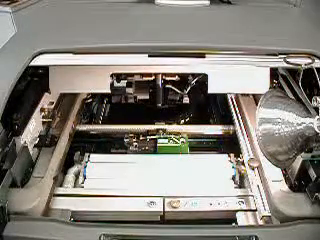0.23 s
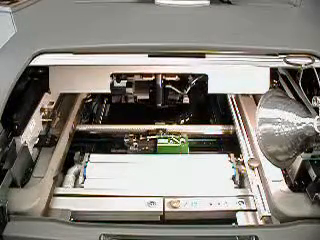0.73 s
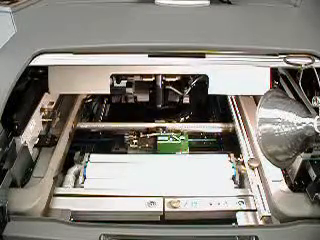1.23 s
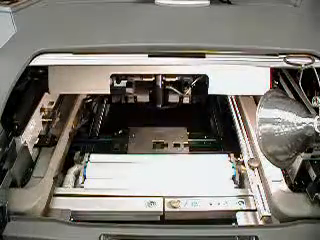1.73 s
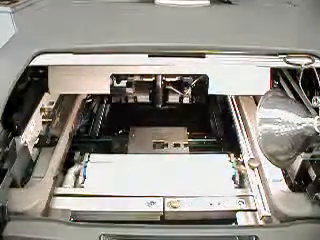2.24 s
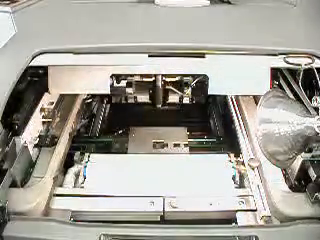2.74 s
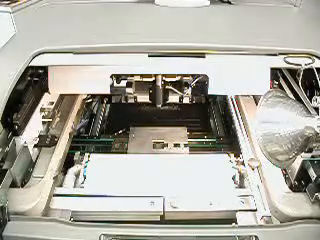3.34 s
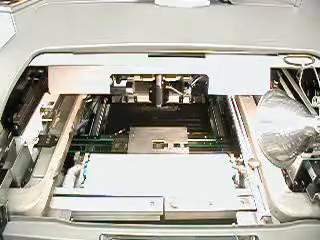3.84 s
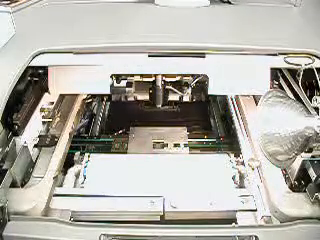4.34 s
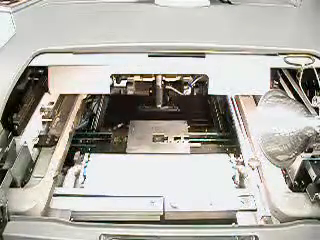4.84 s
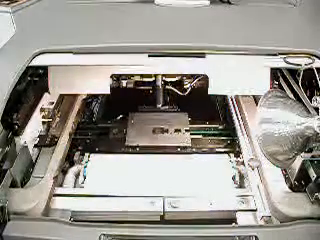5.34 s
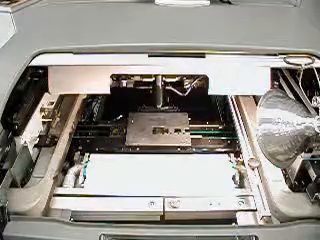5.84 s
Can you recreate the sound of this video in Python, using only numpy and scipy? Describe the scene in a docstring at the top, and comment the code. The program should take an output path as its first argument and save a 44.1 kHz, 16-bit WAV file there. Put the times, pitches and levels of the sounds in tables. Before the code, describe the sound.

A small, low-quality microphone inside a machine cabinet picks up constant fan rush and rough low hum. Air puffs open into steady coloured hiss. A fast carriage gives one brief swooping whine with rumble. Later comes a rapid row of dry ticks, then a buzzing mid-pitched motor and a bright, rattling metal clack. Hiss and motor cut off, and quiet fan hum with faint taps remains.

```python
"""An automated circuit board machine at work, heard from inside: its cooling fans hum and rush.
A vacuum line hisses on and off, with short bursts of air near its start. The head rushes away with
a rising and falling servo whine, a table motor drones and a clamp clacks. Hiss and rattle are shaped
noise; hum, whine and drone are wavering sines. A cheap camera samples the sound 8000 times a second
and holds each sample, which mirrors the spectrum upward."""
import sys
import numpy as np
from scipy import signal
from scipy.io import wavfile
from scipy.ndimage import uniform_filter1d

SR = 44100
rng = np.random.default_rng(int(sys.argv[2]) if len(sys.argv) > 2 else 0)


def dump(signal):
    """Clip the signal to [-1, 1] and save it as 16-bit WAV at the path in sys.argv[1]."""
    limited = np.clip(np.atleast_2d(signal).T, -1, 1)
    pcm = np.round(limited * 32767).astype(np.int16)
    wavfile.write(sys.argv[1], SR, pcm)


N = 268559  # length in samples


def gain_of(db):
    """Turns decibels into a factor."""
    return 10 ** (np.asarray(db) / 20)


def evened(x):
    """Scales a sound to an average (rms) strength of 1."""
    return x / np.sqrt(np.mean(x ** 2) + 1e-20)


def read(points, hz):
    """Reads a curve between its points, along a logarithmic pitch axis."""
    f, value = np.transpose(points)
    return np.interp(np.log(hz + 1), np.log(f + 1), value)


def humps(modes, hz):
    """Adds up resonances: each is strongest at its own pitch and weaker to both sides."""
    return sum(gain_of(db) / np.sqrt(1 + (2 * (hz - f) / width) ** 2) for f, width, db in modes)


def noise(magnitude, patchy_db, size=2048):
    """Noise from random short spectra, with slowly drifting patches; magnitude takes Hz and seconds."""
    hop = size // 4
    frames = N // hop + 5
    hz = np.fft.rfftfreq(size, 1 / SR)
    a, b, patches = rng.standard_normal((frames, len(hz), 3)).T
    # neighbouring pitches and moments share their patches
    patches = uniform_filter1d(patches, 12, 0)
    patches = evened(uniform_filter1d(patches, 8, 1))
    shape = magnitude(hz[:, None], np.arange(frames) * hop / SR)
    z = (a + 1j * b) * shape * gain_of(patchy_db * patches)
    return signal.istft(z, nperseg=size, noverlap=size - hop)[1][:N]


def wander(per_s):
    """A random curve that stays within limits, with per_s new points each second."""
    knots = 1.606 * np.tanh(rng.standard_normal(int(N / SR * per_s) + 3))
    return np.interp(np.arange(N) / SR * per_s, np.arange(len(knots)), knots)


def tones(hz, orders, drift, waver_db, per_s):
    """Sines at multiples of one pitch, each wavering in pitch (drift is a share) and strength."""
    out = np.zeros(N)
    for multiple, db in orders:
        turns = np.cumsum(multiple * hz * (1 + drift * wander(per_s))) / SR
        strength = np.sqrt(2) * gain_of(db + waver_db * wander(per_s))
        out += strength * np.sin(2 * np.pi * turns)
    return out


# low and high blade tone; BLADE_LEVEL is added to the high one: pitch_hz, level_db
BLADE_TONES = [(317.6, -40), (624.5, 0)]
# spectrum of the rush, before evening: pitch_hz, level_db
FAN_RUSH = [(15, -46), (25, -11), (43, -33), (237, -26.5), (313, -15.5), (400, -19), (510, -16),
            (560, -13.5), (625, -9), (700, -16.5), (1170, -21), (1570, -21), (4000, -33), (5200, -64)]
# chance ups and downs in the level of the high blade tone: time_s, level_db
BLADE_LEVEL = [(0, -36), (.2, -31.5), (.52, -28.5), (.66, -37.5), (.92, -33), (1.3, -38.5), (2.25, -30),
               (2.6, -46), (2.95, -35), (3.36, -32), (3.8, -35.5), (4.31, -27), (4.55, -39), (4.8, -30.5),
               (5.29, -28.5), (5.4, -39.5), (5.72, -36.5), (6.09, -28.5)]
RUSH_DB = -30


def fans():
    """Blades stir up a steady rush, a rough low tone and a clearer one about an octave higher."""
    rush = evened(noise(lambda hz, s: gain_of(read(FAN_RUSH, hz)), patchy_db=2.5))
    high_level = gain_of(np.interp(np.arange(N) / SR, *np.transpose(BLADE_LEVEL)))
    low = tones(np.ones(N), BLADE_TONES[:1], drift=0.012, waver_db=3.5, per_s=20)
    high = tones(np.ones(N), BLADE_TONES[1:], drift=0.003, waver_db=3.5, per_s=10)
    return gain_of(RUSH_DB) * rush + low + high_level * high


# spectrum of the rushing air, before evening: pitch_hz, level_db (per Hz)
AIR_SPECTRUM = [(15, -47), (25, -14), (32, -20), (228, -20.5), (330, -10.5), (421, -10), (617, -2.5),
                (870, -7), (1240, -10), (2070, -10.5), (2500, -11), (3200, -12), (3900, -18.5), (4600, -30),
                (8800, -92)]
# resonances of the cabinet: pitch_hz, width_hz, level_db
CABINET_MODES = [(411, 15, -8.5), (510, 13.4, -5), (920, 11, -2), (1088, 18.4, -0.5), (1517, 14.5, -1),
                 (1760, 12, -8), (2010, 15, 0), (2124, 10, -1)]
FLOW_ON_S, FLOW_OFF_S, FLOW_DB = 0.259, 5.137, -25
FLOW_START_DB, FLOW_BUILD_S = -3.5, 0.39  # it starts softer and builds up
FLOW_FADE_DB_PER_S = 90
LEAD_UP_S, LEAD_UP_DB = 0.54, 2  # it swells just before the clamp shuts
CLAMPED_S, CLAMPED_DB = 4.42, -3  # it is softer once the clamp is shut
HEAD_HISS_DB = 6  # extra hiss at the head's top speed


def vacuum():
    """Air hisses, coloured by the cabinet: it builds, swells with the head, softens and dies away."""
    t = np.arange(N) / SR
    unbuilt = np.clip(1 - (t - FLOW_ON_S) / FLOW_BUILD_S, 0, 1)
    lead_up = np.clip(1 - (CLAMPED_S - t) / LEAD_UP_S, 0, 1)
    shut = np.clip((t - CLAMPED_S) / 0.082, 0, 1)
    flow_db = FLOW_DB + FLOW_START_DB * unbuilt + HEAD_HISS_DB * speed()
    flow_db += LEAD_UP_DB * lead_up * (1 - shut) + CLAMPED_DB * shut
    flow_db -= FLOW_FADE_DB_PER_S * np.maximum(t - FLOW_OFF_S, 0)

    def coloured(hz, s):
        return gain_of(read(AIR_SPECTRUM, hz)) * (0.43 + humps(CABINET_MODES, hz))
    hiss = evened(noise(coloured, patchy_db=1.4))
    opening = np.clip((t - FLOW_ON_S) / 0.02, 0, 1)
    return opening * gain_of(flow_db) * hiss


# bursts of air: start_s, level_db, t60_s (time to fall by 60 dB)
AIR_BURSTS = [(0.2698, -20, 0.45), (.3395, -28, 0.27)]
# spectrum of a burst, before evening: pitch_hz, level_db (per Hz)
BURST_SPECTRUM = [(88, -46), (150, -17), (569, 2), (1030, -8.5), (1150, -15), (1370, -2.5), (2190, -2),
                  (4000, -9.5), (5200, -41), (8800, -120)]


def valve():
    """The valve lets air burst out: wide noise that starts suddenly and dies quickly."""
    t = np.arange(N) / SR
    strength = np.zeros(N)
    for start, db, t60 in AIR_BURSTS:
        fading = gain_of(db - 60 * np.clip(t - start, 0, 2) / t60)
        strength += fading * np.clip((t - start) / 0.0017, 0, 1)
    air = noise(lambda hz, s: gain_of(read(BURST_SPECTRUM, hz)), patchy_db=1.5, size=256)
    return strength * evened(air)


# blows of the clamp and stops: start_s, level_db, brightness_db_per_octave
CLAMP_BLOWS = [(0.399, -24.5, -8), (4.291, -27, -7), (4.295, -9.5, 5), (4.304, -11.5, -1.5),
               (4.335, -19.5, -6.5), (5.678, -31, 6), (5.722, -34.5, 7)]
# what the steel frame rings with, before each blow's level is set: pitch_hz, level_db (per Hz)
FRAME_RING = [(35, -60), (60, -45), (308, -17.5), (521, 1), (655, -4.5), (780, -2), (883, -25), (964, 4.5),
              (1210, -10.5), (1470, -0.5), (1810, -1.5), (2090, -0.5), (2400, -13.5), (3360, -21),
              (4000, -28), (5200, -54), (8800, -120)]
# how long the frame rings: pitch_hz, t60_s (time to fall by 60 dB)
FRAME_DECAY = [(250, 0.58), (700, 0.48), (1100, 0.5), (1500, 0.22), (2000, 0.18), (3000, 0.18)]


def blows():
    """Each blow shakes the steel frame: a dense rattle whose pitches die at different rates."""
    out = np.zeros(N)
    t = np.arange(N) / SR
    for at, db, tilt_db in CLAMP_BLOWS:
        def ring(hz, s):
            fall_db = -60 * np.clip(s - at, 0, 1) / read(FRAME_DECAY, hz)
            bright_db = tilt_db * np.log2(hz / 1000 + 0.01)
            return gain_of(read(FRAME_RING, hz) + bright_db + fall_db) * (abs(s - at) < 0.9)
        rattle = noise(ring, patchy_db=1.0, size=512)
        rattle = rattle * np.clip((t - at) / 0.0019, 0, 1)
        first_50_ms = rattle[round(at * SR):][:SR // 20]  # sets the level of the blow
        out += gain_of(db) * rattle / np.std(first_50_ms)
    return out


# travel of the head: time_s, servo_pitch_hz
HEAD_TRAVEL = [(1.25, 483), (1.4, 690), (1.462, 744), (1.522, 1030), (1.58, 991), (1.85, 405)]
TOP_HZ = 1030  # servo pitch at top speed


def head_motion():
    """Gives a soft on-off window for the travel, and the servo pitch at every sample."""
    s, pitch_hz = np.transpose(HEAD_TRAVEL)
    t = np.arange(N) / SR
    on = np.clip(np.minimum(t - s[0], s[-1] - t) / 0.0063, 0, 1)
    return on, np.interp(t, s, pitch_hz)


def speed():
    """How far the head is from half speed (0) to top speed (1); also 0 at rest."""
    on, hz = head_motion()
    return on * np.clip(2 * hz / TOP_HZ - 1, 0, 1)


# spectrum of the carriage rumble, before evening: pitch_hz, level_db (per Hz)
CARRIAGE_RUMBLE = [(59, -59), (100, -16.5), (286, -21), (401, -3), (590, -13), (710, -1), (791, -15),
                   (1010, -7), (1220, -12), (1710, -2), (4000, -59), (5200, -57), (8800, -120)]
# partials of the servo tone: multiple_of_servo_pitch, level_db
SERVO_PARTIALS = [(1, 4), (2, -8.5), (2.33, -16), (1.5, -12)]
# rail resonances that the servo tone sweeps through: pitch_hz, width_hz, level_db
RAIL_MODES = [(724, 50, -5.5), (1002, 49, -1.5), (1580, 86, -4), (1740, 56, 6.5)]
# levels at top speed and at half speed or below
TONE_TOP_DB, TONE_SLOW_DB = -24.5, -33.5
RUMBLE_TOP_DB, RUMBLE_SLOW_DB = -23, -27.5
BRAKE_DB = -7.5  # the tone is weaker while braking
JOLT_S, JOLT_WIDTH_S = 1.455, 0.026  # a brief surge while the pitch rises
JOLT_TONE_DB, JOLT_RUMBLE_DB = 9, 8
JOLT_RAIL_DB = -21.5  # the surge also shakes the rail resonances


def head():
    """The servo sings with its speed, louder where it meets a rail resonance; the carriage rumbles."""
    on, hz = head_motion()
    fast = speed()
    jolt = np.exp(-((np.arange(N) / SR - JOLT_S) / JOLT_WIDTH_S) ** 2)
    slowing = 1.0 * (np.gradient(hz) < 0)
    braking = uniform_filter1d(slowing, size=2000) * np.sqrt(1 - fast)
    tone_db = TONE_SLOW_DB + (TONE_TOP_DB - TONE_SLOW_DB) * fast
    tone_db += BRAKE_DB * braking + JOLT_TONE_DB * jolt
    rumble_db = RUMBLE_SLOW_DB + (RUMBLE_TOP_DB - RUMBLE_SLOW_DB) * fast + JOLT_RUMBLE_DB * jolt
    whine = np.zeros(N)
    for multiple, db in SERVO_PARTIALS:
        partial = tones(hz, [(multiple, db)], drift=0.0278, waver_db=4.5, per_s=140)
        # 0.33 is the share heard between the resonances
        whine += (0.33 + humps(RAIL_MODES, multiple * hz)) * partial
    rumble = evened(noise(lambda f, s: gain_of(read(CARRIAGE_RUMBLE, f)), patchy_db=2.5, size=1024))
    shaken = evened(noise(lambda f, s: humps(RAIL_MODES, f) ** 2, patchy_db=1, size=1024))
    rail = gain_of(JOLT_RAIL_DB) * jolt * shaken
    return on * (rail + gain_of(tone_db) * whine + gain_of(rumble_db) * rumble)


# tones of the drone, relative to its level: pitch_hz, level_db
DRONE_TONES = [(733, 0.5), (781, -2), (1464, -12.5), (1556, -18), (2510, -13)]
# gear noise around the tones, before evening: pitch_hz, width_hz, level_db
GEAR_BANDS = [(734, 51, -2.5), (1500, 90, -17), (2500, 58, -8.5)]
TABLE_ON_S, TABLE_OFF_S, TABLE_RISE_S, TABLE_FALL_S = 4.13, 5.12, 0.036, 0.085
TABLE_DB, TABLE_GROWTH_DB_PER_S = -32.5, 2.5  # level at the start; it grows as the table travels


def table():
    """A motor at even speed: two close tones beat inside a band of gear noise."""
    t = np.arange(N) / SR
    rise = (t - TABLE_ON_S) / TABLE_RISE_S
    fall = 1 - (t - TABLE_OFF_S) / TABLE_FALL_S
    on = np.clip(np.minimum(rise, fall), 0, 1)
    gears = evened(noise(lambda hz, s: humps(GEAR_BANDS, hz) ** 2, patchy_db=2.0))
    drone = tones(np.ones(N), DRONE_TONES, drift=0.00692, waver_db=4.5, per_s=40)
    drone += gain_of(3.0) * gears
    return on * gain_of(TABLE_DB + TABLE_GROWTH_DB_PER_S * (t - TABLE_ON_S)) * drone


def scene():
    """All sources reach one microphone, which feeds two equal channels."""
    mix = fans() + vacuum() + valve() + blows() + head() + table()
    return np.tile(mix, (2, 1))


# moments when the level dips briefly: time_s, width_s
LEVEL_DIPS = [(0.337, 0.0045)]


def dipped(x):
    """Lowers the level for an instant at each dip, to 16 percent at its deepest."""
    t = np.arange(N) / SR
    for at, width in LEVEL_DIPS:
        x = x * (1 - 0.84 * np.exp(-((t - at) / width) ** 2))
    return x


CAMERA_HZ = 8000  # samples a second
OFFSET = 0.0447  # constant shift of every sample; full scale is 1


def sample_and_hold(x):
    """The camera samples with a shift and a hard ceiling, then holds: steps mirror the spectrum up."""
    samples = signal.resample_poly(x, 11 * CAMERA_HZ, SR)[::11]
    samples = np.clip(samples + OFFSET, -0.97, 0.97)
    held = signal.resample_poly(np.repeat(samples, 11), SR, 11 * CAMERA_HZ)[:N]
    return np.pad(held, (0, N - len(held)), "edge")


TICK_S, TICK_GAP_S, TICK_COUNT = 3.5856, 0.02617, 4
TICK_DB = -2.5  # peak before the tone curve below


def ticks():
    """A row of evenly spaced, sharp, dry ticks: very narrow downward pulses."""
    t = np.arange(N) / SR
    starts = TICK_S + TICK_GAP_S * np.arange(TICK_COUNT)
    return -sum(gain_of(TICK_DB) * np.exp(-((t - at) / 0.000028) ** 2) for at in starts)


# tone curve with a notch at 12 kHz and a dull top: pitch_hz, level_db
TONE_CURVE = [(100, -0.5), (4000, 1.5), (7000, 1), (11000, 1.5), (11800, -5), (12050, -25), (12300, 1.5),
              (14900, -2), (15500, -30)]
# nothing is heard above this edge, which is higher in loud moments: loudness_db, edge_hz
TREBLE_LIMIT = [(-34, 12600), (-22.5, 13500), (-18.5, 14700)]
# level of the side signal (left against right) inside its patches, against the middle: pitch_hz, level_db
SIDE_LEVEL = [(200, -36), (600, -26), (1200, -10), (2000, -7), (3200, -9), (5000, -18), (10000, -12)]


def tone_and_side(held, x):
    """Applies the tone curve and treble edge; a side signal is heard only in random narrow patches."""
    t = np.arange(N) / SR
    hz, s, z = signal.stft(held, SR, nperseg=1024, noverlap=768)
    power = np.interp(s, t, uniform_filter1d(x ** 2, size=1024))
    loud_db = 10 * np.log10(uniform_filter1d(power, size=40) + 1e-9)
    edge_hz = np.interp(loud_db, *np.transpose(TREBLE_LIMIT))
    z = z * gain_of(read(TONE_CURVE, hz))[:, None] * (hz[:, None] < edge_hz)
    # one block in ten, each about 600 Hz by 0.1 s, has a side signal
    has_side = rng.random((len(s) // 16 + 1, len(hz) // 14 + 1)).T < 0.1
    has_side = has_side.repeat(14, axis=0).repeat(16, axis=1)[:len(hz), :len(s)]
    side = 1j * z * gain_of(read(SIDE_LEVEL, hz))[:, None] * has_side
    return signal.istft(np.array([z + side, z - side]), nperseg=1024, noverlap=768)[1][:, :N]


def roll_off(x):
    """The treble ends steeply here."""
    return signal.sosfilt(signal.butter(12, 15510, fs=SR, output="sos"), x)


def record(dry):
    """The level dips, the camera samples and holds, ticks join in, then tone and side are shaped."""
    x = dipped(dry[0])
    held = sample_and_hold(x) + ticks()
    both = tone_and_side(held, x)
    return roll_off(both)


dry = scene()
out = record(dry)
dump(out)
```